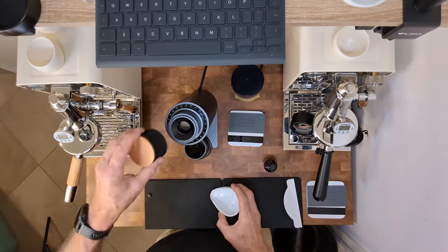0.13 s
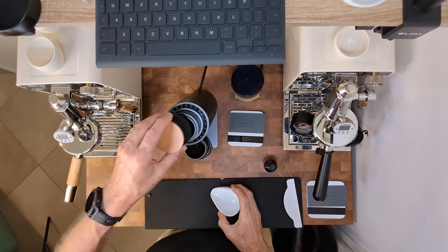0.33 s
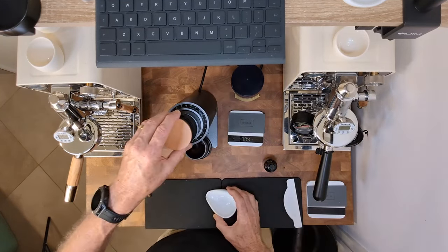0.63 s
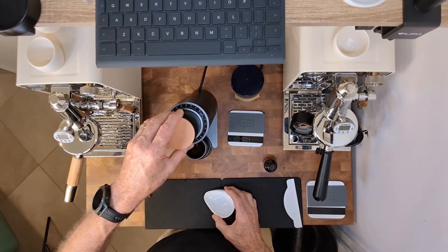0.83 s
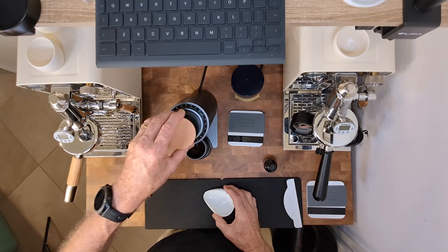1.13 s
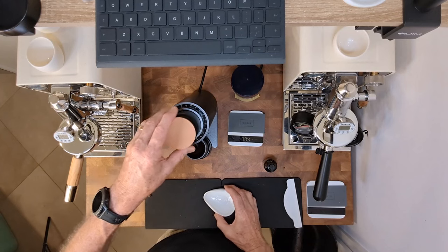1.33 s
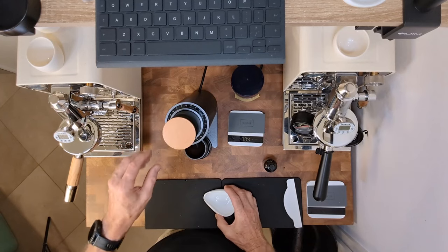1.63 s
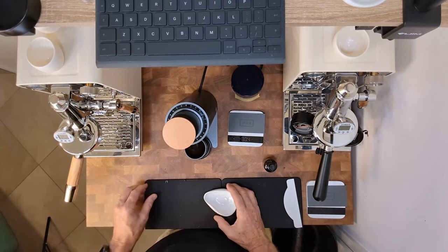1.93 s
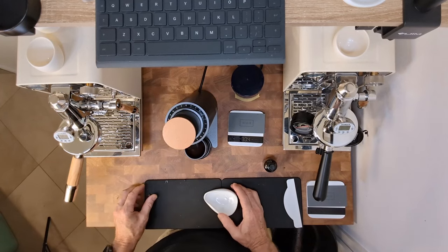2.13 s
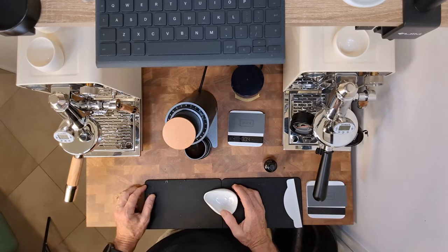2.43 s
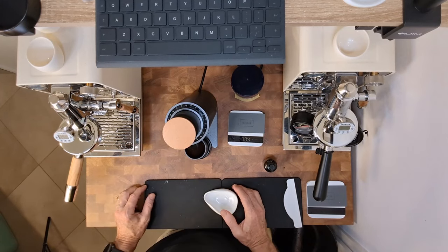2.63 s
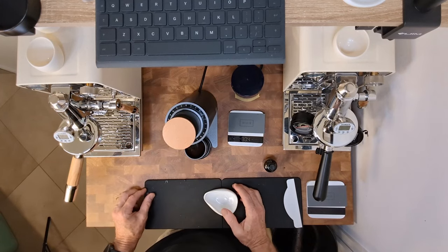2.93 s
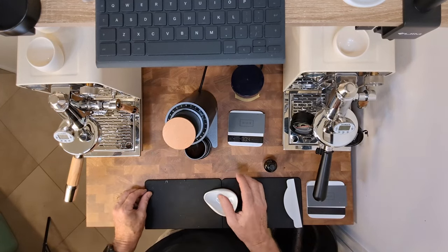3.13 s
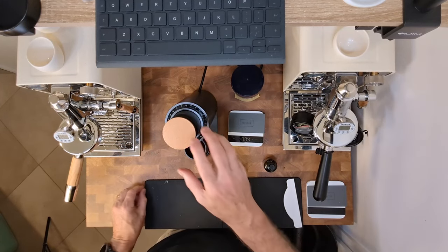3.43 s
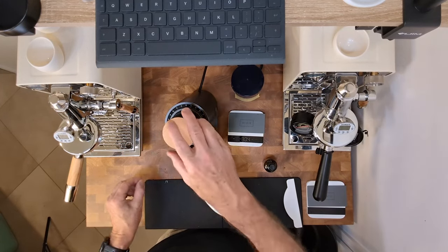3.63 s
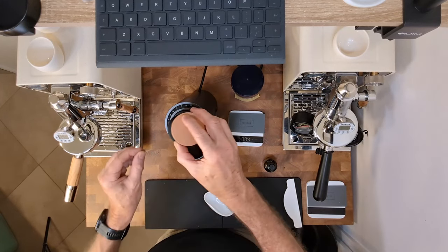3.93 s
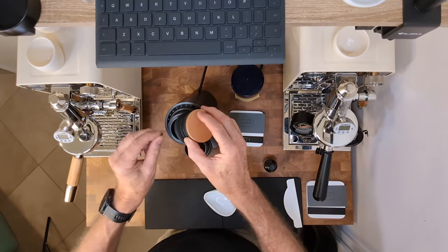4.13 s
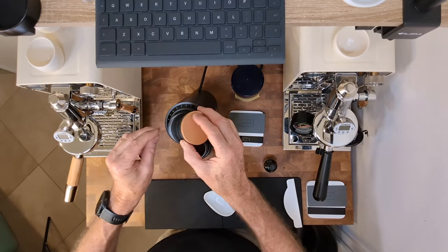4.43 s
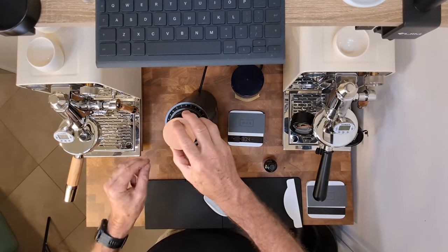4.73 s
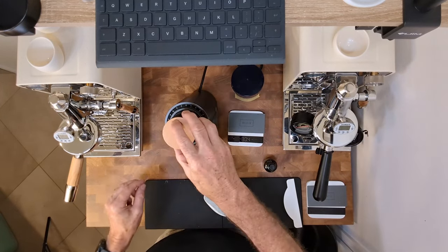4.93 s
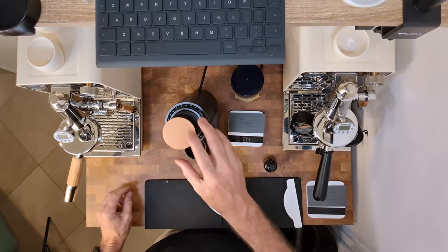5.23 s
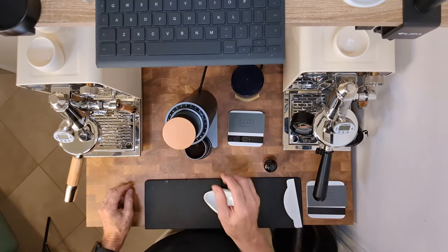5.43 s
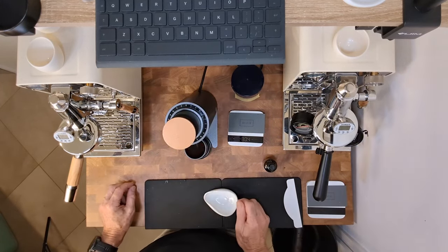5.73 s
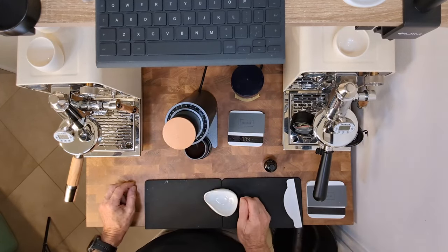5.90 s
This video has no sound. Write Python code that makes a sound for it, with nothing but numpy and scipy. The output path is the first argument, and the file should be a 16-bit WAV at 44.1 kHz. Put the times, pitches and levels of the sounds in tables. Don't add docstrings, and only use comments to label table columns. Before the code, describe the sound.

An electric burr coffee grinder whirs loudly and harshly, beans thumping inside, while a cup knocks on its funnel rim and briefly lets out hiss.

```python
import sys
import numpy as np
from scipy import signal
from scipy.io import wavfile
from scipy.ndimage import uniform_filter1d

SR = 44100
rng = np.random.default_rng(int(sys.argv[2]) if len(sys.argv) > 2 else 0)


def int16_out(signal):
    q = np.round(np.clip(np.atleast_2d(signal).T, -1, 1) * 32767)
    wavfile.write(sys.argv[1], SR, q.astype(np.int16))


def invert_db(level):
    return 10 ** (np.asarray(level, dtype=float) / 20)


N = 267510


def read(points, hz):
    f, value = np.transpose(points)
    return np.interp(np.log(hz + 1), np.log(f + 1), value)


def along(points):
    return np.interp(np.arange(N) / SR, *np.transpose(points))


def evened(x):
    return x / np.sqrt(np.mean(x ** 2) + 1e-20)


def wobble(shape, *passes):
    noise = rng.standard_normal(shape)
    for size, axis in passes:
        noise = uniform_filter1d(noise, size=size, axis=axis)
    return evened(noise)


def add(mix, s, sound):
    part = mix[round(s * SR):][:len(sound)]
    part += sound[:len(part)]


def humps(modes, hz):
    f, width, db = (c[:, None] for c in np.transpose(modes))
    return invert_db(2 * db) / (1 + ((hz - f) / width) ** 2 * 2) ** 2


def ring(hz, db, t60):
    t = np.arange(int(.3 * SR)) / SR
    return invert_db(db - 60 * t / t60) * np.sin(2 * np.pi * hz * t) * np.minimum(t / 0.0014, 1)


# time in seconds, gap under the cup from 0 (shut) to 1 (clear).
SET_DOWN = [
    (0, 0.95),
    (.18, 1.),
    (.3, 0.79),
    (.45, 0.75),
    (.68, 0.23),
    (.78, 0.18),
    (.9, 0.1),
]
# time in seconds, gap from 0 (shut) to 1 (clear).
LIFTED = [
    (3.82, 0.),
    (3.92, 0.25),
    (4.05, 0.47),
    (4.2, 0.52),
    (4.35, 0.86),
    (4.5, 0.57),
    (4.68, 0.28),
    (4.76, .12),
    (4.84, 0.),
]


def cup_gap(t):
    return np.clip(np.interp(t, *np.transpose(SET_DOWN + LIFTED)), 0, 1)


# start in seconds, peak level in dB, main ring in Hz.
CUP_KNOCKS = [(0.432, -10.5, 1096), (0.46, -11, 1053), (0.481, -17, 1070), (0.507, -7.5, 1080),
              (0.53, -18, 1080), (0.6145, -8, 1064), (0.6305, -16, 1153), (0.686, -19, 1177),
              (0.927, -15.5, 1126), (1.061, -15, 1144), (3.906, -14, 1010), (3.93, -21, 797),
              (3.965, -15, 953), (4.068, -22, 935), (4.186, -17.5, 897), (4.445, -17.5, 930),
              (4.508, -12, 1037), (4.607, -13, 1080)]
# pitch as a ratio to the main ring, level in dB, time to fall 60 dB in seconds.
CUP_MODES = [(1, 0.5, 0.086), (2.2, -15, 0.099), (0.67, -14, 0.057), (4.6, -22.5, 0.036), (7.7, -29, .015)]
# start in seconds, pitch in Hz, level in dB, time to fall 60 dB in seconds.
PINGS = [
    (4.043, 12000, -44, .004),
    (4.19, 6000, -30, .006),
    (4.26, 12000, -42, 0.0042),
    (3.908, 8100, -36, 0.033),
    (4, 13800, -44, .05),
    (4.333, 13500, -46, .04),
    (5.1, 8400, -34, .05),
    (4.709, 8280, -34, .04),
    (4.348, 13124, -37, .22),
    (4.54, 6500, -32, .006),
]


def handling():
    out = np.zeros(N)
    for s, db, hz in CUP_KNOCKS:
        add(out, s, sum(ring(hz * ratio, db + mode_db + 2.5, t60) for ratio, mode_db, t60 in CUP_MODES))
    for s, hz, db, t60 in PINGS:
        add(out, s, ring(hz, db, t60))
    return out


# start in seconds, peak level in dB.
SPITS = [(0.0994, -33), (0.1994, -34), (0.3294, -35), (0.5072, -34), (0.6194, -36), (3.9115, -33),
         (4.0444, -33), (4.0894, -35), (4.1384, -35), (4.1844, -34), (4.2567, -34), (4.3271, -31),
         (4.3694, -33), (4.4414, -28), (4.4994, -31), (4.5394, -34), (4.5999, -32), (4.6808, -33),
         (4.7087, -34)]


def spits():
    out, t = np.zeros(N), np.arange(int(.3 * SR)) / SR
    band = signal.butter(1, [5500, 14000], 'band', fs=SR, output='sos')
    fizz = signal.sosfilt(band, rng.standard_normal((len(SPITS), len(t))))
    for (s, db), noise in zip(SPITS, fizz):
        fade = invert_db(db - 8 - 60 * t / .07)
        add(out, s, noise * fade * np.minimum(t / .002, 1))
    return out


UNDER = .905
# start in seconds, peak level in dB, ring in Hz.
THUMPS = [(0.021, -14, 1190), (0.2177, -12, 1130), (0.826, -21, 1160), (1.0206, -20, 1183),
          (1.1722, -15, 1186), (1.288, -10, 1155), (1.3517, -15, 1150), (1.5193, -7.5, 1112),
          (1.5707, -13, 1192), (1.6257, -14, 1110), (1.6759, -8.5, 1040), (1.724, -15, 1144),
          (1.7685, -9, 1145), (1.9051, -11, 1160), (2.0106, -11, 1130), (2.1327, -11, 1149),
          (2.3159, -17, 1144), (2.3486, -12, 1156), (2.416, -15, 1136), (2.4662, -15, 1144),
          (2.577, -19, 1149), (2.6289, -13, 1147), (2.6738, -9, 1155), (2.7107, -10, 1134),
          (2.8594, -23, 1166), (2.9194, -31, 1110), (3.0596, -15, 1132), (3.4333, -10, 1141),
          (3.4729, -9, 1158), (3.561, -18, 1160), (3.6288, -17, 1130), (3.8515, -25, 1130),
          (4.2612, -18, 1186), (4.35, -18, 1157), (4.5387, -9, 1040), (4.815, -16, 1196),
          (4.8594, -10, 1140), (4.96, -13, 1160), (5.0029, -13, 1137), (5.029, -15, 1154),
          (5.1103, -11, 1140), (5.489, -12, 1160), (5.7105, -6.5, 1145), (5.8521, -18, 1140),
          (5.8855, -17, 1124), (6.0284, -13, 1045)]


def thumps():
    out, t = np.zeros(N), np.arange(int(.3 * SR)) / SR
    t60, rise_s = 0.11, 0.0035
    for s, db, hz in THUMPS:
        pair = ring(hz, db - 3, t60) + ring(hz * UNDER, db - 12.5, t60)
        add(out, s, pair * np.minimum(t / rise_s, 1))
    return out


def tumble(per_s=45, spread_db=2.5, wall_hz=1148, db=-26, t60=.1):
    hits = rng.random(N) < per_s / SR
    size = invert_db(spread_db * np.minimum(rng.exponential(1, N), 3)) * hits
    knock = ring(wall_hz, db, t60) + ring(wall_hz * UNDER, db - 6, t60) + ring(wall_hz * .77, db - 8.5, .06)
    return signal.oaconvolve(size, knock)[:N]


def fuzzy(hz, db, blur_hz, flutter=.3):
    waver_hz = blur_hz * wobble(N, (500, 0), (500, 0))
    size = 1 + flutter * wobble(N, (700, 0), (700, 0))
    sag = .0025 * wobble(N, (9000, 0), (9000, 0))
    turns = np.cumsum(hz * (1 + sag) + waver_hz) / SR
    return np.sqrt(2) * invert_db(db) * size * np.sin(2 * np.pi * turns)


def surging(rows, rest_db, lift_db, stretch, drift_db=2.0, open_db=-3.0):
    t = np.arange(N // 64 + 2) * 64 / SR
    drift = wobble(len(t), (50, 0), (50, 0))
    s, db, length = (c[:, None] for c in np.transpose(rows))
    rest = invert_db(rest_db + open_db * cup_gap(t) + drift_db * drift)
    bells = invert_db(db + lift_db) * np.exp(-((t - s) / (stretch * length)) ** 2)
    return np.interp(np.arange(N) / SR, t, 20 * np.log10(rest + bells.max(axis=0)))


# time in seconds, peak level in dB,
# length in seconds. First the lower and higher drone:
LOW_DRONE = [(0.09, -21, 0.28), (0.28, -21, 0.056), (0.44, -14, 0.069), (0.5, -18, 0.08),
             (0.63, -29, 0.031), (0.94, -21, 0.032), (1.08, -27, 0.039), (1.29, -23, 0.066),
             (1.37, -10.5, 0.023), (1.51, -16.5, 0.088), (1.64, -20, 0.026), (1.79, -17, 0.04),
             (1.9, -19, 0.1), (2.02, -18, 0.028), (2.14, -28, 0.037), (2.43, -19, 0.027),
             (2.58, -17, 0.028), (2.71, -18, 0.043), (3.07, -22, 0.022), (3.46, -19, 0.086),
             (3.54, -29, 0.067), (4.64, -19, 0.27), (4.82, -20, 0.04), (5.02, -15, 0.029),
             (5.12, -27, 0.035), (5.46, -22, 0.024), (5.72, -22, 0.032), (5.89, -13.5, 0.042)]
HIGH_DRONE = [(0.06, -15, 0.12), (0.21, -22, 0.07), (0.34, -14, 0.047), (0.52, -17, 0.15),
              (1.78, -21, 0.09), (1.92, -29, 0.17), (2.09, -24, 0.16), (2.21, -26, 0.036),
              (2.47, -21, 0.16), (2.69, -29, 0.04), (2.9, -27, 0.088), (2.98, -33, 0.04),
              (3.08, -20, 0.094), (3.25, -21, 0.055), (3.33, -24, 0.13), (3.67, -24, 0.055),
              (4.0, -20, 0.064), (4.08, -18.5, 0.04), (4.2, -13.5, 0.029), (4.31, -28, 0.043),
              (4.41, -30, 0.062), (4.58, -38, 0.08), (5.23, -22, 0.061), (5.52, -27, 0.078),
              (5.66, -20.5, 0.14), (5.96, -18, 0.045)]
# time in seconds, peak in dB, length in seconds.
CHUTE = [(0.21, -31, 0.06), (0.35, -38, 0.091), (0.4, -25, 0.066), (0.51, -33, 0.06), (0.64, -24, 0.16),
         (1.06, -28.5, 0.051), (1.36, -32, 0.17), (1.65, -27, 0.078), (1.77, -30, 0.17), (4.09, -29, 0.058),
         (4.23, -32, 0.11), (4.48, -25, 0.06)]
# time in seconds, peak in dB, length in seconds.
LOW_WHINE = [
    (0.09, -38, 0.046),
    (0.39, -30, 0.068),
    (1.59, -31, 0.025),
    (1.96, -23, 0.08),
    (2.23, -29, 0.11),
    (3.2, -34, 0.065),
    (4.04, -36, 0.2),
    (4.19, -39, 0.05),
    (4.39, -45, 0.11),
    (5.2, -26, 0.12),
]
HIGH_WHINE = [
    (1.97, -39, 0.058),
    (2.25, -38, 0.13),
    (2.67, -34, 0.051),
    (2.81, -29, 0.08),
    (3.15, -32, 0.076),
    (3.66, -30, 0.044),
    (5.2, -27, 0.067),
    (5.29, -23.5, 0.071),
    (5.68, -30, 0.093),
    (5.79, -27.5, 0.048),
]
# time in seconds, peak in dB, length in seconds.
HUM_SURGES = [(1.04, -52, 0.058), (1.34, -54, 0.07), (1.79, -53, 0.17), (2.36, -55, 0.08),
              (2.5, -54, 0.072), (3.08, -54, 0.08), (3.18, -60, 0.065), (3.29, -60, 0.07), (3.56, -51, 0.1),
              (3.92, -51, 0.092), (4.53, -54, 0.069), (4.96, -57, 0.11)]
DOUBLE_SURGES = [(0.14, -44.5, 0.1), (0.31, -52, 0.18), (0.77, -50, 0.17), (0.97, -47, 0.17),
                 (1.03, -48, 0.17), (1.31, -59, 0.088), (1.85, -55, 0.11), (2.01, -59, 0.052),
                 (2.2, -55, 0.086), (3.09, -50, 0.054), (4.92, -48, 0.08), (5.29, -51, 0.083)]
# time in seconds, pitch in Hz.
MESH = [(0, 1222), (.6, 1224), (.9, 1250), (1.3, 1245), (1.6, 1224), (1.8, 1235), (2.2, 1246), (2.6, 1240),
        (3.3, 1246), (3.5, 1215), (3.9, 1228), (4.7, 1220), (5.0, 1240), (5.3, 1255), (5.6, 1238),
        (6.07, 1248)]
# time in seconds, pitch in Hz.
CHUTE_PITCH = [(0, 1699), (.7, 1698), (1.5, 1676), (2.3, 1665), (2.8, 1745), (3.4, 1730), (3.9, 1708),
               (4.6, 1675), (5.2, 1730), (6.07, 1735)]
# pitch in Hz, blur in Hz, rms level in dB.
THIN = [(632, 13.06, -47), (863, 17.04, -45.5), (912, 14.2, -41.5), (923, 13, -62), (1108, 17.4, -42),
        (1040, 9.8, -52), (1304, 10.3, -42), (1637, 9.7, -45), (1730, 9.66, -44), (1542, 13.4, -48.5),
        (1984, 12.7, -44), (2152, 12, -49), (2890, 10.7, -53), (3358, 12.56, -41.5), (4380, 15.34, -50.5),
        (7260, 10.5, -66), (8410, 21, -77), (9690, 17, -78)]


def tones():
    mesh_hz = along(MESH)
    out = fuzzy(1146., surging(LOW_DRONE, -36, -6.5, 0.64), 13.7, flutter=0.22)
    out += fuzzy(mesh_hz, surging(HIGH_DRONE, -33.5, -6.5, 0.53, open_db=5.0), 11.88, flutter=0.35)
    out += fuzzy(along(CHUTE_PITCH), surging(CHUTE, -41.0, -7.0, 0.75, open_db=3.5), 11.07, flutter=0.26)
    out += fuzzy(2432., surging(LOW_WHINE, -40.5, -10.0, 0.84, open_db=3.0), 15.2, flutter=0.15)
    out += fuzzy(2540., surging(HIGH_WHINE, -45.0, -6.5, 0.85), 27.94, flutter=0.42)
    out += fuzzy(2 * mesh_hz, -43 - 6 * cup_gap(np.arange(N) / SR), 12.25, flutter=0.41)
    out += fuzzy(98.5, surging(HUM_SURGES, -62.5, -2.0, 0.52), 6.4, flutter=0.63)
    out += fuzzy(204., surging(DOUBLE_SURGES, -59, -3.5, 0.55), 14.4, flutter=0.39)
    return out + sum(fuzzy(hz, db, blur, flutter=0.54) for hz, blur, db in THIN)


def funnel_controls(t):
    gap = cup_gap(t)[:, None]
    ajar = np.minimum(gap / 0.26, 1)
    leak_db = -33 + 32 * ajar ** 0.94
    hollow_db = -33 * (1 - ajar) + 5.5 * ajar - 4.5 * gap ** 2
    throat_db = -15 + 21 * gap
    rim_hz = 8200 + 430 * gap
    squeeze_db = 3.5 * ajar * (1 - gap)
    return leak_db, hollow_db, throat_db, rim_hz, squeeze_db


# frequency in Hz, level in dB.
LEAK = [(3500, -69), (4700, -31), (5600, -35), (6300, -60), (7800, -35), (9500, -44.5), (12000, -49.5),
        (12800, -55), (13800, -53), (15700, -55)]
# pitch in Hz, width in Hz, level in dB.
HOLLOW = [(825, 125, -11), (963, 55, -5.5), (1080, 40, -27), (1637, 160, -13.5)]
# time in seconds, pitch in Hz.
THROAT = [(0, 5100), (.6, 5000), (4., 5850), (4.6, 5700)]


def funnel(t, hz, whistle_db=-31, whistle_width=240):
    leak_db, hollow_db, throat_db, rim_hz, squeeze_db = funnel_controls(t)
    whistle_shape = 1 / (1 + 2 * ((hz - rim_hz) / whistle_width) ** 2) ** 2
    whistle = invert_db(2 * (whistle_db + squeeze_db) + leak_db) * whistle_shape
    throat_hz = np.interp(t, *np.transpose(THROAT))[:, None]
    top = np.clip(hz / 9000 - 1, 0, 1)
    beam_db = top * (.3 * leak_db + .32 * throat_db + 3.5 + 8 * (throat_hz / 800 - 6.3))
    hiss = invert_db(2 * (leak_db + beam_db)) * invert_db(2 * read(LEAK, hz)) * (hz > 3000)
    rattle = invert_db(2 * (throat_db - 25.0)) / (1 + 2 * ((hz - throat_hz) / 520) ** 2) ** 2
    hollow = invert_db(2 * hollow_db) * humps(HOLLOW, hz).sum(axis=0)
    return hiss + whistle + hollow + rattle


def burrs(cracks_per_s=500, spread_db=1.5, share=0.24):
    hits = rng.random(N) < cracks_per_s / SR
    cracks = invert_db(spread_db * np.minimum(rng.exponential(1, N), 4)) * hits
    bursts = signal.lfilter([1], [1, -np.exp(-1 / (0.0024 * SR))], cracks)
    return evened(rng.standard_normal(N) * (1 + share * evened(bursts)))


# time in seconds, level in dB.
GRIND = [(0, -25), (.75, -25.5), (1.6, -25), (1.72, -24), (2.04, -25.5), (2.95, -25), (3.2, -25.5),
         (4.1, -25.5), (4.7, -24.5), (5.3, -26), (6.07, -24.5)]
# time in seconds, lift in dB.
CRUNCHES = [
    (1.72, 1.),
    (4.04, 2.7),
    (4.19, 4.),
    (4.46, 2.4),
    (5.91, 1.5),
]
# pitch in Hz, width in Hz, level in dB.
HOUSING = [(75, 20, -57), (148, 30, -36), (214, 34, -30.5), (380.4, 21.5, -28), (502.5, 13, -21),
           (630.2, 59, -8), (737, 52, -10.5), (888, 28.5, -6.5), (1048, 52, -10), (1160, 93, -7),
           (1267, 36, -7.5), (1550, 58, -18.5), (1770, 143, -16.5), (1948, 27, -16.5), (2175, 52, -16.5),
           (2422, 39, -13.5), (2570, 160, -17), (2830, 20, -23), (3280, 19, -13.5), (3510, 100, -19),
           (3845, 280, -24), (4344, 82, -19.5), (4466, 30, -18), (4850, 44, -25), (5500, 34, -38),
           (6720, 69, -33.5), (7260, 110, -32.5), (8500, 58, -36), (9650, 84, -38), (10160, 71, -47)]
# frequency in Hz, level in dB per Hz.
RUSH = [(25, -88), (70, -28), (200, -26.5), (306, -48), (430, -31), (610, -6), (1180, -8.5), (1410, -6.5),
        (3040, -6.5), (6210, -21), (9300, -35), (11100, -35), (11800, -42), (15600, -46)]


def grinder(wander_db=2.0, patchy_db=1.0, rush_db=-14, crunch_s=0.0078):
    hz, t, z = signal.stft(burrs(), SR, nperseg=2048, noverlap=1536)
    wander = wobble((len(t), len(HOUSING)), (14, 0))
    patches = wobble((len(t), len(hz)), (6, 0), (16, 1))
    grind_db = np.interp(t, *np.transpose(GRIND))
    crunch_db = sum(db * np.exp(-((t - at) / crunch_s) ** 2) for at, db in CRUNCHES)
    load = invert_db(2 * (grind_db + crunch_db + 27))[:, None]
    housing = invert_db(2 * wander_db * wander) @ humps(HOUSING, hz) + invert_db(2 * (read(RUSH, hz) + rush_db))
    power = (load * housing + funnel(t, hz)) * invert_db(2 * patchy_db * patches)
    return invert_db(-2) * signal.istft(z * np.sqrt(power.T), SR, nperseg=2048, noverlap=1536)[1][:N]


def scene():
    return (grinder() + tones() + handling() + thumps() + spits() + tumble())[None]


# time in seconds, lost above this many Hz,
# dB by which a peak must top its neighbours to survive.
STARVED = [(.893, 4600, 11), (1.172, 4850, 9), (1.265, 4800, 9), (2.147, 5230, 2), (2.356, 7000, 8.5),
           (2.844, 5570, 10), (2.937, 5000, 3), (3.122, 4830, 4.5), (3.447, 4300, 8), (3.494, 3900, 18),
           (3.517, 3600, 19), (3.54, 3920, 16), (5.653, 4730, 20), (5.676, 4650, 19)]
# time in seconds, pitch in Hz.
SURVIVORS = [(3.494, 7290), (3.494, 4830), (3.517, 6740), (3.517, 5680), (3.517, 4830), (3.517, 4350),
             (3.54, 9670), (3.54, 5680), (3.54, 4830), (5.653, 7400), (5.676, 7400)]


def dropouts(x, lead=1528, hop=1024):
    n, k = np.arange(2 * hop) + .5, np.arange(hop) + .5
    window = np.sin(np.pi * n / (2 * hop))[:, None]
    basis = window * np.cos(np.pi / hop * np.outer(n + hop / 2, k)) * np.sqrt(2 / hop)
    hz = k * SR / (2 * hop)
    clean = signal.sosfilt(signal.butter(2, 45, 'high', fs=SR, output='sos'), x)
    blocks = np.pad(clean, (lead, 3 * hop - (lead + N) % hop), 'reflect').reshape(-1, hop)
    lines = np.c_[blocks[:-1], blocks[1:]] @ basis
    t = (np.arange(len(lines)) * hop + hop - lead) / SR
    power = lines ** 2 + 1e-20
    over_db = 10 * np.log10(power / uniform_filter1d(power, size=60, axis=1))

    weak = uniform_filter1d(power, size=4, axis=1) < invert_db(-127)
    moods = wobble(power.shape, (4, 0), (9, 1))
    band = uniform_filter1d(uniform_filter1d(power, size=30, axis=1), size=3, axis=0)
    band_db = 10 * np.log10(band)
    limit = -2.5 + 4.5 * np.clip((hz - 14800) / 600, 0, 1) + 1.5 * (abs(hz - 12900) < 700)
    empty = .25 * (band_db - np.median(band_db, axis=0)) + 2.5 * moods < limit
    keep = 1. - (weak | empty) * (hz > 11400)

    starved_s = np.array(STARVED)[:, 0]
    for s, above_hz, need_db in STARVED:
        frame = np.argmin(abs(t - s))
        alone = np.sum(abs(starved_s - s) < .03) < 2
        firm_bass = (abs(hz - 350) > 120) & ((s < 5) | (hz > 150))
        spared = np.clip(1 - (hz - above_hz) / 600, 0, 1) * (firm_bass | alone)
        excess_db = over_db[frame] - need_db - (hz - above_hz) / 800
        keep[frame] *= np.clip(excess_db / .5 + 60 * spared ** 2, 0, 1)
    for s, line_hz in SURVIVORS:
        keep[np.argmin(abs(t - s)), abs(hz - line_hz) < 45] = 1.6
    halves = (lines * keep) @ basis.T
    return (halves[1:, :hop] + halves[:-1, hop:]).ravel()[lead - hop:][:N]


def band_limit(x):
    return signal.sosfilt(signal.butter(12, 15700, fs=SR, output="sos"), x)


def record(dry):
    mix = dropouts(dry[0])[None]
    return band_limit(mix)


dry = scene()
out = record(dry)
int16_out(out)
```